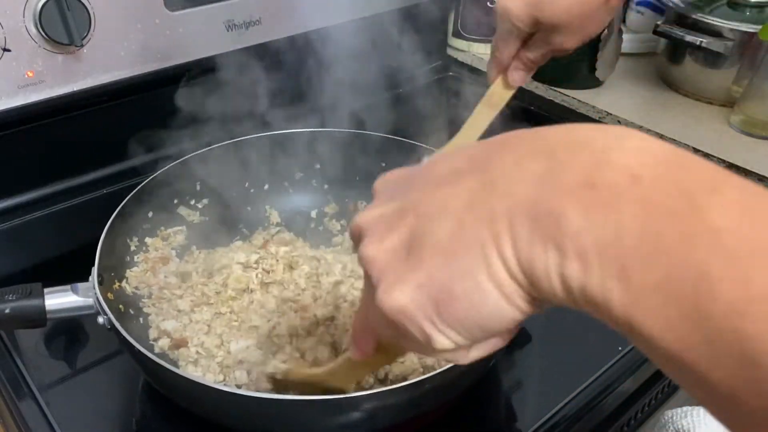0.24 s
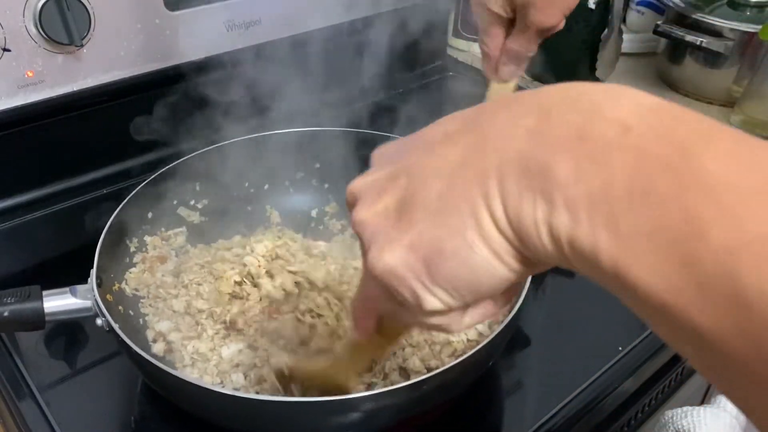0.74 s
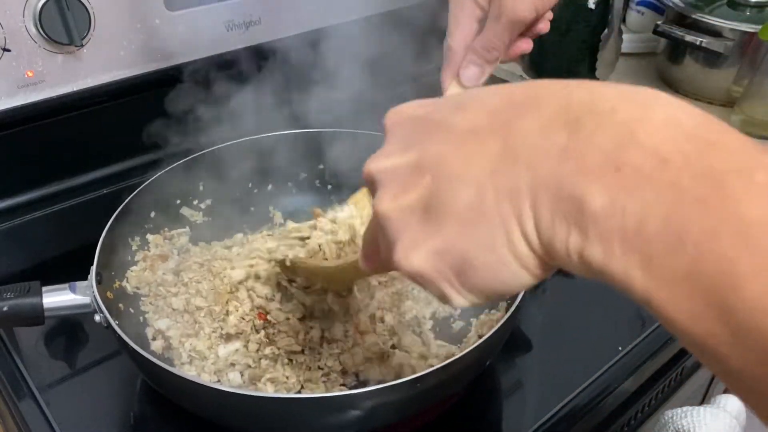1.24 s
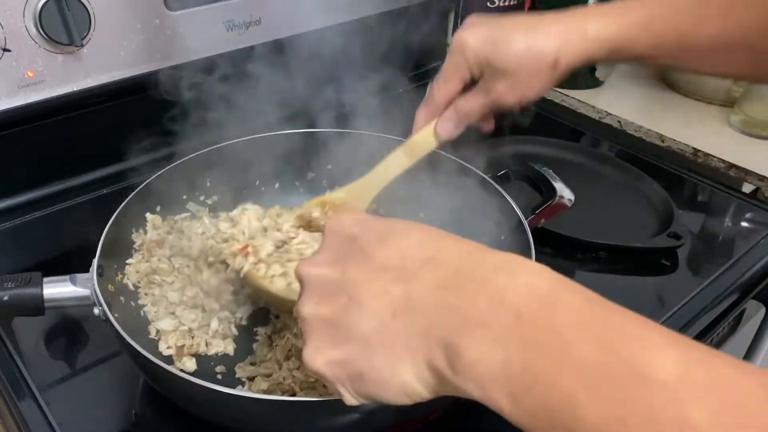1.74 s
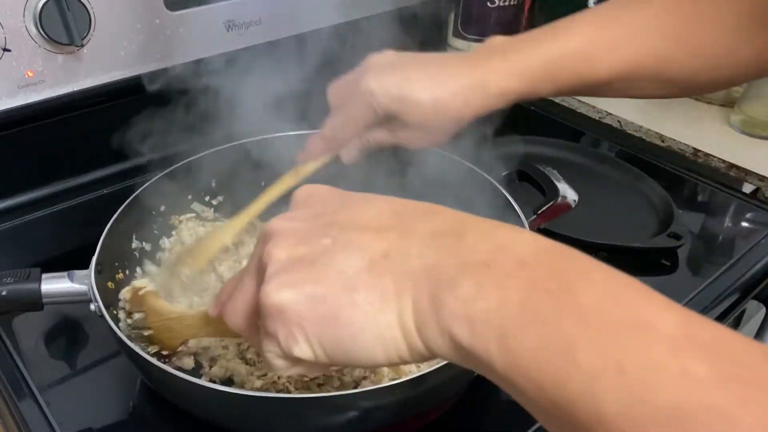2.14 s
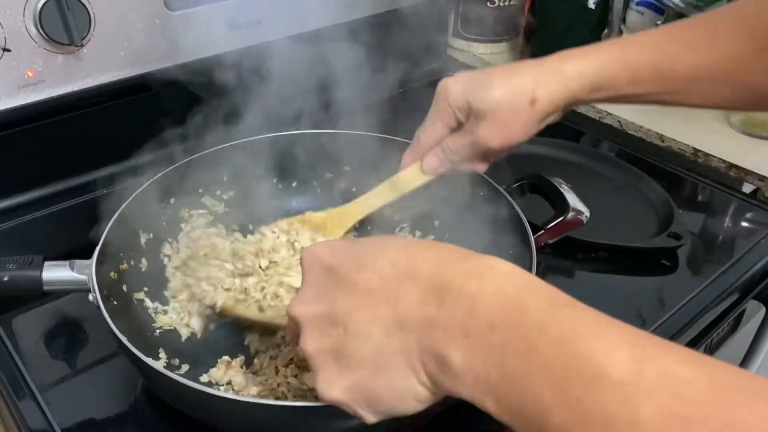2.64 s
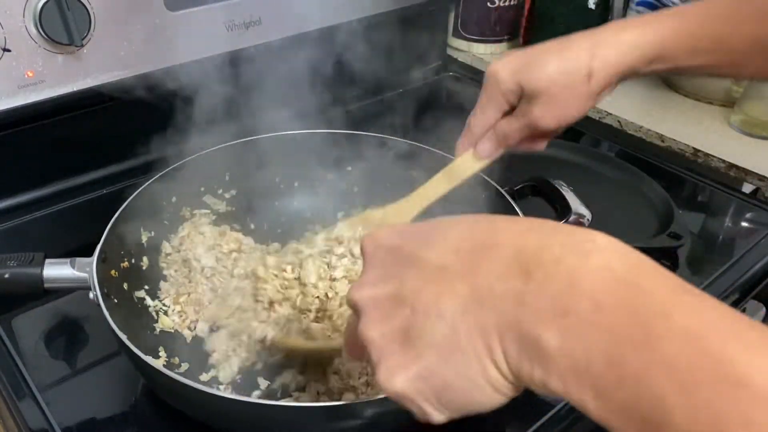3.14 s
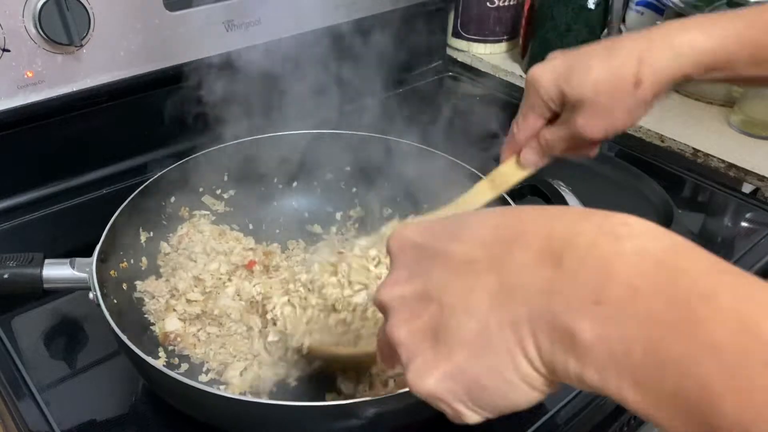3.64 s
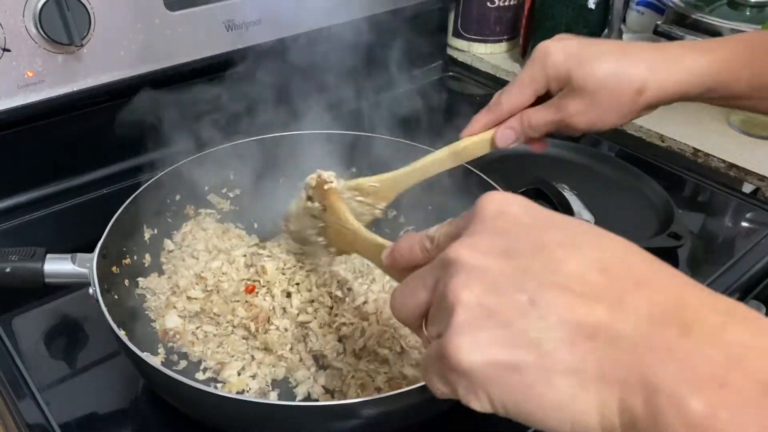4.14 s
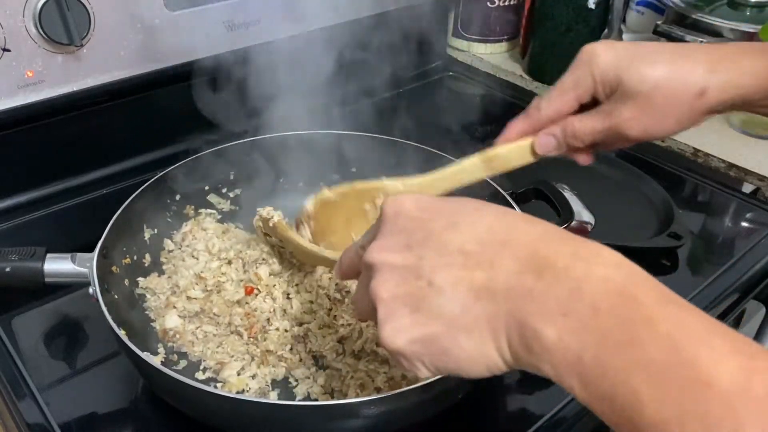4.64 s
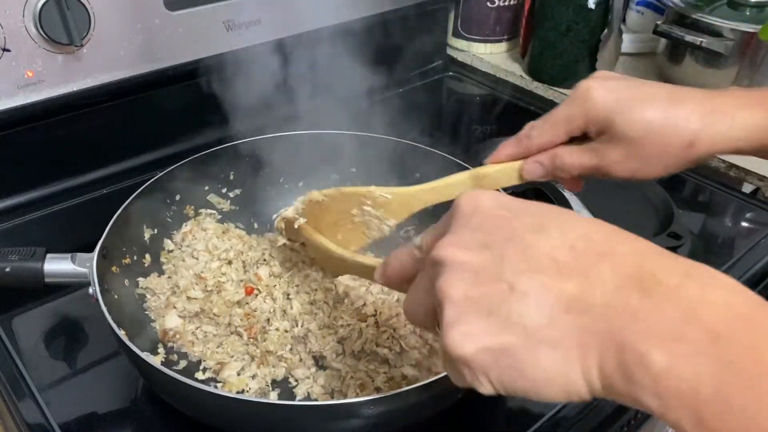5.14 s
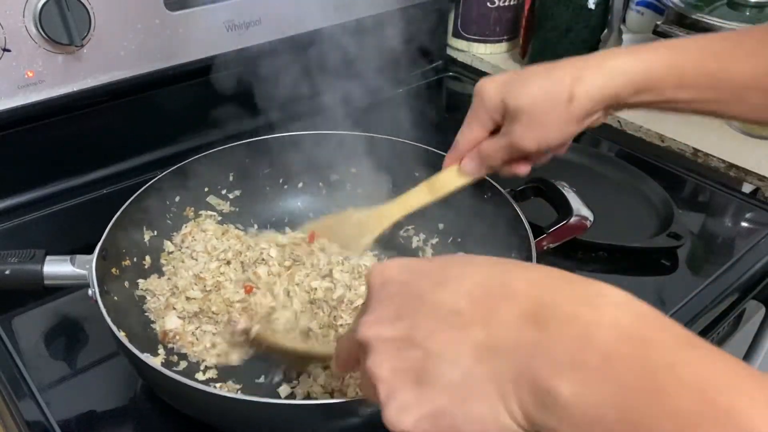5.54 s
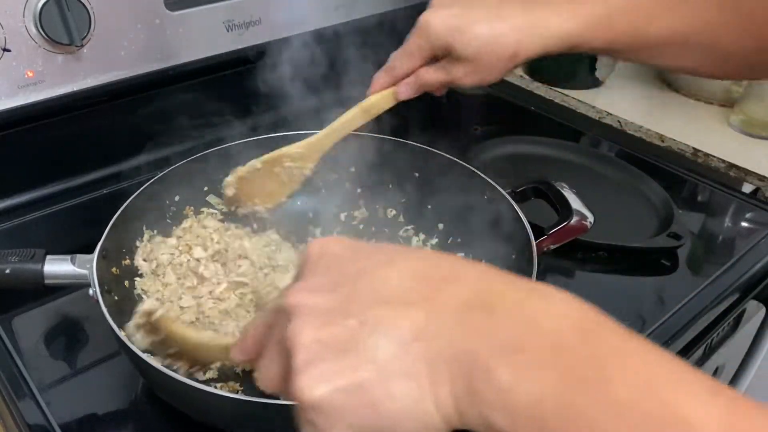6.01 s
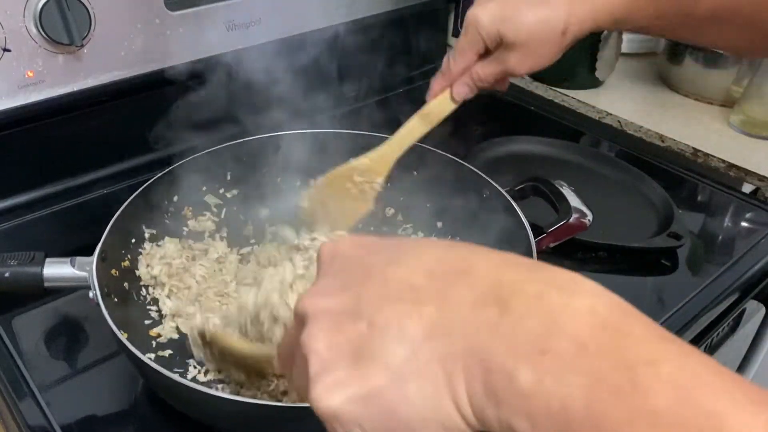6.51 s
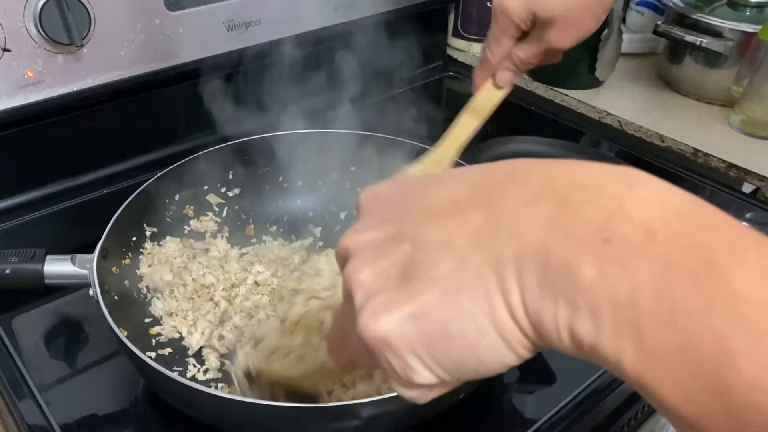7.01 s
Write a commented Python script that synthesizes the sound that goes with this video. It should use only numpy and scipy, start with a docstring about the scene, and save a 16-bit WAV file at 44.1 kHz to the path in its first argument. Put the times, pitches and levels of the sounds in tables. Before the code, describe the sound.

Moist shredded meat fries in a pan on a stove, with constant crackly sizzle and thin hiss. Two wooden spatulas stir quickly, each scraping push making the sizzle surge, with hollow knocks and clatter on the metal. The stirring eases in the middle, leaving sizzle and sharp fat spits, then resumes with the hardest knocks. Close stereo microphone, small kitchen, short echoes.

```python
"""Sizzle and thin steam hiss run throughout, from grains and noise; shredded meat fries on a glass hob.
Each stroke of the two wooden spatulas swells the sizzle, steam, boiling juice, scrape and stove rumble.
Spatula blows crack, ring the pan's modes and clatter, band by band; fat spits in short noise snaps.
A small kitchen adds brief echoes; two microphone ports hear the sum, alike at some pitches only."""
import sys
import numpy as np
from scipy import signal
from scipy.fft import rfft, irfft, next_fast_len
from scipy.io import wavfile
from scipy.ndimage import uniform_filter1d

SR = 44100
rng = np.random.default_rng(int(sys.argv[2]) if len(sys.argv) > 2 else 0)


def unload_wav(signal):
    """Save mono or channel-first audio to the path in sys.argv[1] as 16-bit WAV at rate SR, clipped to [-1, 1]."""
    wavfile.write(
        sys.argv[1],
        SR,
        np.round(np.clip(np.atleast_2d(signal).T, -1, 1) * 32767).astype(np.int16),
    )


N = 320586
SIZE = next_fast_len(N, True)
TIME_S = np.arange(N) / SR
FREQ_HZ = np.maximum(np.fft.rfftfreq(SIZE, 1 / SR), 1)

# Source spectra, relative: hz, density_db_per_hz
SIZZLE_SPECTRUM = [(300, -18), (900, -13), (1450, 1), (2100, 1), (3200, -1.5), (5200, -1), (7000, -7.5),
                   (9500, -7), (14000, -21.5)]
STEAM_SPECTRUM = [(3000, -8.5), (6500, 4.5), (9800, 5.5), (15300, 3.5)]
SCRAPE_SPECTRUM = [(130, -12), (220, -15.5), (340, 0.5), (430, -4), (650, 1), (900, 0.5), (1500, -6),
                   (2500, -31), (5000, -18.5)]
RUMBLE_SPECTRUM = [(20, -34), (42, -24), (63, -0.5), (80, -1), (105, 0.5), (130, -3.5), (165, -10.5),
                   (220, -8), (400, -31)]
# Meat lying still, levels before layer trims: time_s, sizzle_db, steam_db, juice_db
SIMMER_LEVELS = [(0, -52, -47, -63), (.4, -49, -47, -57), (.8, -49, -56, -60), (1.35, -47, -60, -48.5),
                 (1.8, -54, -51, -56), (2.352, -60, -79, -54.5), (2.801, -72, -54.5, -65.5),
                 (3.346, -56.5, -49.5, -80), (3.8, -58, -49.5, -59), (4.1, -50, -56, -54.5),
                 (4.7, -48.5, -54, -48.5), (5.3, -47, -52, -57.5), (5.7, -52.5, -49.5, -69),
                 (6.4, -48, -59, -48), (6.8, -54.5, -50, -66), (7.27, -53, -48, -71)]
# Strokes pushing meat onto hot metal; settle before linger factors, levels before layer trims:
# peak_s, push_s, settle_s, sizzle_db, steam_db, scrape_db, drag_db
STIR_STROKES = [(0.09, 0.024, 1, -46.5, -64, -58.5, -63), (0.351, 0.071, 0.079, -38, -41.5, -43.5, -51),
                (0.65, 0.017, 0.19, -43.5, -53, -53, -61), (1.0, 0.12, 0.13, -39.5, -46, -47.5, -56.5),
                (1.482, 0.071, 0.15, -38, -51, -43, -52), (1.88, 0.085, 0.22, -48, -56, -54.5, -60),
                (2.19, 0.12, 0.23, -39.5, -48.5, -48, -54.5), (2.52, 0.1, 0.93, -44, -52, -50.5, -56.5),
                (3.1, 0.14, 0.13, -42, -48, -49.5, -55), (3.47, 0.038, 0.092, -44.5, -52, -67, -57),
                (3.61, 0.085, 0.17, -38, -58, -45.5, -51.5), (3.9, 0.092, 0.79, -46, -57, -57.5, -65.5),
                (4.44, 0.031, 0.023, -46, -58, -50.5, -74), (5.501, 0.075, 0.082, -35, -45, -38, -45.5),
                (5.75, 0.039, 0.066, -72, -47, -57, -59), (5.91, 0.059, 0.13, -44, -52, -51.5, -57),
                (6.13, 0.073, 0.15, -39.5, -55, -43.5, -49), (6.575, 0.069, 0.094, -37, -47, -38, -49.5),
                (7.14, 0.19, 0.11, -40, -46.5, -47, -55)]
# Spatula blows; thud to click relative to level_db; snap lifts the crack, ring lifts the two notes:
# start_s, level_db, thud_db, boom_db, body_db, clack_db, rap_db, tick_db, click_db, snap_db, ring_db,
# length_factor, pan_note_hz, wood_note_hz
SPATULA_BLOWS = [(0.199, -42, 6, 5, 4, 6, 6, 5.5, -2, 1, 2, 1.9, 662, 980),
                 (0.263, -37.5, 3, -5, -7, -15, -9, -18, -18, -1, 12, 0.99, 277, 1640),
                 (0.336, -44, 3, -13, -9, -9, -11, -6, -12, 11, 2, 0.86, 348, 1535),
                 (0.725, -41.5, 5.5, 6, 8, 12, -12, 4.5, -1, 4, 7, 1.4, 521, 892),
                 (0.825, -36.5, 3.5, -5, -3.5, -9, -20, -24, -26, 0, 6, 0.82, 292, 894),
                 (1.031, -44, 7.5, 2.5, -10, -6, -7, -14, -16, 0, 7, 0.89, 348, 1205),
                 (1.374, -49, 11.5, 14, -2, -11, -6, -7, -10, -7, -3, 0.82, 420, 1300),
                 (1.391, -45.5, -8, -7, 5, -13, -2, -1, -7, 2, 14, 0.77, 438, 1340),
                 (2.041, -37.5, 8.5, -2.5, -3, -3, -7, -11, -17, -1.5, 6, 1.4, 350, 1375),
                 (2.106, -45.5, 12.5, 0, -9, -10, 1, -4, -11, -5, 2, 1.1, 365, 1440),
                 (2.4091, -37.5, 8.5, -9, -7, -7, -5.5, -9, -14, -2, -3, 0.81, 333, 1380),
                 (2.4301, -30.5, -4.5, -9, 4, 2, -7, 0.5, -4.5, 4, -2, 1.05, 596, 2000),
                 (2.455, -39.5, -7, -8, 3, -6, -11, -2, -9, -3, -2, 0.81, 595, 2010),
                 (2.635, -33, 2, -1, -3, -6.5, -8.5, -20, -24, 2, 8.5, 0.92, 318, 1190),
                 (3.003, -63.5, 12, 17, -3, -7, -8, -11, -13, -1, 0, 1, 337, 1345),
                 (3.317, -56.5, 6.5, 8, -6, -13.5, -18, -16, -18, 3, 8, 1.2, 326, 1140),
                 (3.454, -59.5, -18, -5, 6, 13, 0, 0, 12, -3, 19, .9, 640, 717),
                 (3.5, -44, -4, -2, 4, -5, -5, -4, -9, 4, 6, 0.98, 437, 710),
                 (3.924, -54, -6, 11.5, -6, -1, -4, -8, -10, -2, -4, 1.2, 337, 1285),
                 (4.224, -50, -16, -10, 0.5, -3, -3, -4, -8, 16, 0, 0.63, 370, 1450),
                 (4.962, -51, -4, -18, 0, -7, -4, -7, -10, 0, 8, 0.62, 600, 755),
                 (5.344, -40.5, 8.5, 10.5, 4.5, 15, 9.5, 3.5, 6, -1, 8, 1.8, 505, 1002),
                 (5.3839, -28.5, -1.5, -1.5, -0.5, 3, 2.5, -7, -12, 3.5, 13, 0.79, 324, 1200),
                 (5.4095, -37, -3, -6, 3.5, -5, -12, -16, -18, 3, 1, 0.9, 340, 820),
                 (6.007, -49.5, 5, 5.5, -4, -8, -11, -16, -18, -3, -3, 0.65, 312, 782),
                 (6.074, -29.5, 9.5, -1.5, -4, -2.5, -4.5, -8, -13, -1.5, 7.5, 1, 363, 1444),
                 (6.096, -34, 6, -5, -3.5, -3, -3, -9, -18, 1, 6.5, 0.87, 354, 1430),
                 (6.217, -37, 1.5, 1, -2.5, -25, -21, -22, -24, 3.5, 1, 1.1, 343, 1500),
                 (6.339, -31.5, 2.5, -1.5, -4.5, -9, -13, -19, -25, 2, 9, 0.9, 328.6, 712),
                 (6.36, -38.5, 1, 0, 0, -9, -21, -22, -24, 5, 3, 1.1, 377, 715),
                 (6.4983, -32.5, -10, -4, 5, -8, -5.5, -16, -15, 6, 11, 0.98, 480, 1336),
                 (7.001, -38.5, 7.5, 8.5, 6, 13, 8.5, 3, 0, 0, 9, 0.97, 495, 1016),
                 (7.028, -38, -3, -6, 3.5, -1, -2, -10, -14, 0, 6, 0.85, 495, 1005),
                 (7.09, -30.5, -0.5, 0, -3.5, -6, -11, -22, -17, -1, 2, 0.73, 282, 1189)]
# Bands of a blow: knock, boom, thud, body, clack, rap, tick, valley above tick, click; t60 at length 1:
# low_hz, high_hz, rise_s, t60_s, tail_db, gain_db, clatter_db, crack_db, side_factor
BANDS = [(242, 420, 0.0009, 0.057, -10, 1, -4.5, 13, 0.5), (58, 121, 0.011, 0.15, -13, 0, -6, -21, 0.12),
         (115, 257, 0.0085, 0.066, -10, -0.5, -9, -5, 0.2),
         (420, 690, 0.0005, 0.055, -12, 0.5, -1, 14, 1.05),
         (690, 1150, 0.00047, 0.07, -12, -0.5, 1, 13, 0.55),
         (1180, 1750, 0.0005, 0.08, -11, -0.5, 1.5, 13, 0.8),
         (1800, 2850, 0.00015, 0.085, -15, -0.5, 3, 16, 0.6),
         (2850, 4100, 0.0003, 0.08, -16, -6.5, 8, 18, 0.55),
         (4150, 5450, 0.0003, 0.09, -16, -0.5, 7, 18, 0.55)]
# Pan and stove-top resonances before scatter; t60 at length 1: hz, level_db, t60_s
MODES = [(64.05, -10, 0.64), (98.8, -2.5, 0.15), (148.6, -6, 0.21), (165.8, 2.5, 0.16), (214.4, -9, 0.19),
         (240, -17, 0.22), (278.3, -8, 0.4), (329.6, -2, 0.19), (357.3, 0.5, 0.23), (443, -4.5, 0.26),
         (488.6, 0.5, 0.24), (559, -3, 0.16), (638, -2.5, 0.15), (710, 0.5, 0.088), (773, 0, 0.16),
         (823, 1.5, 0.08), (890, 14, 0.029), (1007, -4, 0.22), (1102, 1.5, 0.06), (1245, 1, 0.19),
         (1335, -3, .08), (1440, -14, 0.08), (1517, 0, 0.11), (1615, 0.5, 0.13), (1990, 3, 0.12),
         (2110, 5, 0.091), (2370, 5, 0.062), (3360, 13, 0.082), (4640, 5, 0.059), (5100, 0, 0.069)]
# Crack returns from pan wall, hob and back panel, before delay scatter: delay_s, gain
CRACK_RETURNS = [(0.0005, 0.72), (.0019, -.7), (.0046, 0.28), (.0071, -0.33)]
# Single fat spits, before port balance: start_s, peak_db, centre_hz, reach_each_side_octaves
FAT_SPITS = [(4.138, -34, 10400, .6), (4.289, -30, 2200, 0.89), (4.385, -31, 1700, 1),
             (4.445, -29, 1600, .8), (4.652, -22.5, 2090, 1.3), (4.659, -25, 1780, 1),
             (4.719, -24.5, 2700, 1.2), (4.76, -25, 4200, 0.76), (4.8, -29, 7000, 1.1),
             (4.852, -28, 1500, 0.6), (4.858, -29, 1500, 0.98), (4.878, -32, 4970, 0.97),
             (4.889, -28, 3800, 1.2), (5.128, -28.5, 2200, 0.92), (5.283, -35, 2630, 1.2)]
# Microphone ports; likeness before its treble limit: hz, likeness_0_to_1, left_minus_right_db
PORT_RESPONSE = [(100, 0.96, 0.2), (200, 0.82, 1), (356, 0.72, -3.5), (515, 0.3, 3), (644, 0.34, 3.5),
                 (1350, 0.16, 1.5), (2350, 0, 3), (4260, 0, 4), (5800, 0.05, 7), (7760, 0.97, -0.5),
                 (14000, 1, 0)]

PORT_LAG_S, TOP_HZ = 0.0002953, 15450
STEAM_LAG_S = 0.034  # steam rises a little after the sizzle
STEAM_LINGER, JUICE_LINGER = 1.05, 0.31  # factors on settle_s
STROKE_JUICE_DB = -8.5  # relative to a stroke's sizzle_db
REST_SCRAPE_DB, REST_RUMBLE_DB = -56.5, -68  # between strokes, before layer trims
POP_CAP_DB = 14
MODE_SCATTER_DB, MODE_DETUNE = 2.5, 0.007  # standard deviations; detune is a ratio
NOTE_BUILD_UP_S, NOTE_T60_S = 0.0018, 0.07  # t60 at length 1
CONTACT_DB, CONTACT_LO_HZ, CONTACT_HI_HZ = 3, 480, 2900
BLOW_LEAN_DB = 0.8  # left minus right, before port balance
STRAY_SPIT_DB, STRAY_SPIT_HZ = -36.5, 2600  # centres of random ranges


def undb(db):
    """Decibels to amplitude."""
    return 10 ** (np.asarray(db) / 20)


def unit(x):
    """Scale to rms 1."""
    return x / np.sqrt(np.mean(x ** 2))


def on_bins(table, axis=1):
    """Interpolate a table column over the FFT bins, on log frequency."""
    table = np.array(table)
    return np.interp(np.log(FREQ_HZ), np.log(table[:, 0]), table[:, axis])


def bandpass(x, lo_hz, hi_hz, order):
    """Causal Butterworth band-pass."""
    edges_hz = [lo_hz, min(hi_hz, .45 * SR)]
    return signal.sosfilt(signal.butter(order, edges_hz, "band", fs=SR, output="sos"), x)


def walk(rate_hz):
    """Smooth random drift with a spread near 1."""
    hold = max(int(SR / rate_hz), 1)
    steps = np.repeat(rng.standard_normal(N // hold + 1), hold)
    return np.sqrt(3 / 2) * uniform_filter1d(steps, hold)[:N]


def add(out, sound, start_s):
    """Mix a stereo sound in at its start time."""
    i = max(int(start_s * SR), 0)
    out[:, i:i + sound.shape[1]] += sound[:, :max(N - i, 0)]


def grains(rate_hz, spread_db, cap_db):
    """Random clicks of random sign and exponentially spread dB size, scaled to rms 1."""
    size = undb(np.minimum(spread_db * rng.exponential(size=N), cap_db))
    fires = rng.random(N) < rate_hz / SR
    return unit(fires * size * rng.choice([-1, 1], N))


def follow_power(x, decay_per_s):
    """Power envelope with exponential decay."""
    keep = np.exp(-decay_per_s / SR)
    return signal.lfilter([1 - keep], [1, -keep], x ** 2)


def hear(x, spectrum, near_s, room_db, t60_s=0.14):
    """Colour a source and carry it to both ports; noise under its power envelope stands for echoes."""
    near = follow_power(x, 2 / near_s)
    late = follow_power(x, np.log(1e6) / t60_s)
    share = undb(2 * room_db)
    echoes = np.sqrt((near + share * late) / (1 + share)) * rng.standard_normal((2, N))
    # bass reaches both ports at once
    lag_s = np.array([[0], [PORT_LAG_S]]) * (FREQ_HZ > 1500)
    direct = np.exp(-2j * np.pi * FREQ_HZ * lag_s)
    # power share both ports hear alike; scattering keeps the treble partly unlike
    likeness = np.clip(on_bins(PORT_RESPONSE), 0, np.where(FREQ_HZ > 1500, .8, 1))
    ports = np.sqrt(likeness) * direct * rfft(x, SIZE) + np.sqrt(1 - likeness) * rfft(echoes, SIZE)
    return irfft(ports * unit(undb(on_bins(spectrum))), SIZE)[:, :N]


def swells(levels_db, linger, lag_s):
    """Summed stroke power: Gaussian rise during the push, exponential decay as the meat settles."""
    power = np.zeros(N)
    for (peak_s, push_s, settle_s, *_), db in zip(STIR_STROKES, levels_db):
        age_s = TIME_S - peak_s - lag_s
        shape = np.where(age_s < 0, (age_s / push_s) ** 2, age_s / (settle_s * linger))
        power += undb(2 * db) * np.exp(-2 * shape)
    return power


def stirred(rest_db, levels_db, linger, lag_s=0):
    """Layer level in dB: resting power plus stroke power."""
    return 10 * np.log10(undb(2 * rest_db) + swells(levels_db, linger, lag_s))


def sizzle(level_db):
    """Bursting steam bubbles: a dense fizz of grains with sparser, coarser crackle on top."""
    fizz = grains(rate_hz=16000, spread_db=-0.5, cap_db=6) * undb(level_db + 3.0 + .5 * walk(30))
    # crackle comes from the whole pan, so it swells less per stroke
    crackle = grains(rate_hz=600, spread_db=3.5, cap_db=29.5) * undb(.5 * level_db - 28.7)
    return hear(fizz + crackle, SIZZLE_SPECTRUM, near_s=0.003, room_db=0)


def steam(level_db):
    """The finest bubbles merge into thin, smooth noise."""
    hiss = rng.standard_normal(N) * undb(level_db + 1.5)
    return hear(hiss, STEAM_SPECTRUM, near_s=0.0018, room_db=-19)


def juice(level_db, centre_hz, spread, cycles, count):
    """Wet bubbles pop under the meat as damped sines, 60 dB down after the given cycles."""
    t, out = TIME_S[:400], np.zeros((2, N))
    start, place, lag = rng.random((count, 3)).T[:, :, None]
    hz = centre_hz * np.exp(spread * rng.standard_normal((count, 1)))
    size = undb(np.minimum(6.3 * rng.exponential(size=(count, 1)), POP_CAP_DB))
    pops = size * np.sin(2 * np.pi * hz * t) * np.exp(-np.log(1000) * hz * t / cycles)
    at = (start * N).astype(int) + np.arange(len(t))
    late = (lag * 2 * PORT_LAG_S * SR).astype(int)  # random lag at the right port
    out[0] = np.bincount(at.ravel(), (pops * np.sqrt(place)).ravel(), N)[:N]
    out[1] = np.bincount((at + late).ravel(), (pops * np.sqrt(1 - place)).ravel(), N)[:N]
    return unit(out) * undb(level_db)


def scrape(level_db):
    """Wood sticks and slips over the pan and tumbles moist shreds: grains with a wavering level."""
    slips = grains(rate_hz=2500, spread_db=3.5, cap_db=8.5) * undb(level_db + 2.3 * walk(40))
    return hear(slips, SCRAPE_SPECTRUM, near_s=0.016, room_db=6)


def rumble(level_db):
    """The dragged pan shakes the hollow stove top: low noise with a wavering level."""
    shaking = rng.standard_normal(N) * undb(level_db + 2.5 + 0.66 * walk(12))
    return hear(shaking, RUMBLE_SPECTRUM, near_s=.01, room_db=-6)


def contact(level_db):
    """Bare wood touches metal: one band-passed pulse with the given peak."""
    pulse = bandpass(signal.unit_impulse(SR // 100), CONTACT_LO_HZ, CONTACT_HI_HZ, order=2)
    return undb(level_db) * np.array([pulse, pulse]) / abs(pulse).max()


def crack(lo_hz, hi_hz, size):
    """A contact click's early returns in one band, peak 1."""
    clicks = np.zeros(size)
    for delay_s, gain in CRACK_RETURNS:
        clicks[int(delay_s * rng.uniform(.85, 1.15) * SR)] += gain
    sound = bandpass(clicks + 1e-18, lo_hz, hi_hz, order=2)
    return sound / abs(sound).max()


def ring_modes(t, age, notes_hz, note_db):
    """Damped sines of the pan and of two contact notes, with the frequencies and mid/side weights."""
    notes = [(f, note_db, NOTE_T60_S) for f in notes_hz]  # set by contact place and grip
    hz, db, t60_s = np.array(list(MODES) + notes).T[:, :, None]
    size = undb(db + MODE_SCATTER_DB * rng.standard_normal(hz.shape)) * rng.choice([-1, 1], hz.shape)
    detuned_hz = hz * (1 + MODE_DETUNE * rng.standard_normal(hz.shape))
    turn = np.float32(2 * np.pi * detuned_hz) * np.float32(t)
    modes = np.exp(np.float32(-np.log(1000) / t60_s) * np.float32(age)) * np.sin(turn)
    modes[-2:] *= 1 - np.exp(-t / NOTE_BUILD_UP_S)  # notes follow just after the crack
    # each mode radiates more to one side
    weights = np.array([size[:, 0], size[:, 0] * rng.uniform(-0.97, 1, len(hz))])
    return hz[:, 0], modes, weights


def knock(levels_db, notes_hz, snap_db, note_db, length):
    """One blow: crack, ringing modes and dense clatter per band; heavy low modes build up late."""
    t = TIME_S[:2 * SR // 5]
    age = t / max(length, .2)  # a spatula that stays on the pan damps it sooner
    mode_hz, modes, weights = ring_modes(t, age, notes_hz, note_db)
    noise, out = rng.standard_normal((2, len(t))), 0
    for level_db, band in zip(levels_db, BANDS):
        lo_hz, hi_hz, rise_s, t60_s, tail_db, gain_db, clatter_db, crack_db, side_factor = band
        inside = (mode_hz >= lo_hz) & (mode_hz < hi_hz)
        fade = undb(-60 * age / t60_s) + undb(tail_db - 60 * t / .35)
        clatter = unit(bandpass(noise, lo_hz, hi_hz, order=3)) * fade * undb(clatter_db)
        sound = clatter + weights[:, inside] @ modes[inside]
        sound[0] += undb(crack_db + snap_db) * crack(lo_hz, hi_hz, size=len(t))
        for f in notes_hz:
            if lo_hz <= f < hi_hz:  # stronger response near the contact note
                sound = sound + bandpass(sound, f / 1.07, f * 1.03, order=1)
        mid, side = sound * (1 - np.exp(-(t / rise_s) ** 2))
        # highest 10 ms rms sets the band level
        peak = np.sqrt(uniform_filter1d(mid ** 2, size=441, mode="constant").max())
        stereo = np.array([mid + side_factor * side, mid - side_factor * side])
        out = out + undb(level_db + gain_db) / peak * stereo
    return out


def spatulas():
    """Wood strikes the pan; place and firmness of each blow set its band levels and notes."""
    out = np.zeros((2, N))
    for blow in SPATULA_BLOWS:
        start_s, db, thud_db, boom_db, body_db, clack_db, rap_db, tick_db, click_db = blow[:9]
        snap_db, note_db, length, pan_hz, wood_hz = blow[9:]
        valley_db = (tick_db + click_db) / 2
        levels_db = db + np.array([0, boom_db, thud_db, body_db, clack_db,
                                   rap_db, tick_db, valley_db, click_db])
        add(out, knock(levels_db, (pan_hz, wood_hz), snap_db, note_db, length), start_s)
        add(out, contact(db + clack_db + snap_db + CONTACT_DB), start_s)
    return out * undb(BLOW_LEAN_DB * np.array([[.5], [-.5]]))


def spits(burst_s, echo_db, echo_s, count):
    """Water drops burst in the fat: noise snaps with a short pan echo, plus random strays."""
    t, out = TIME_S[:1200], np.zeros((2, N))
    strays = []
    for when, size, pitch in rng.random((count, 3)):
        peak_db = STRAY_SPIT_DB + 8 * (size - .5)
        centre_hz = STRAY_SPIT_HZ * 2 ** (2 * pitch - 1)
        strays.append((when * N / SR, peak_db, centre_hz, 1))
    fade = np.exp(-t / burst_s) + undb(echo_db) * np.exp(-t / echo_s)
    for start_s, db, hz, reach in list(FAT_SPITS) + strays:
        burst = rng.standard_normal((2, len(t))) * fade
        snap = bandpass(burst, hz / 2 ** reach, hz * 2 ** reach, order=2)
        add(out, undb(db) * snap / abs(snap).max(), start_s)
    return out


def scene():
    """The stirred pan: a varying simmer, stroke swells, blows and spits."""
    sizzle_db, steam_db, scrape_db, drag_db = np.transpose(STIR_STROKES)[3:]
    time_s, *columns = np.transpose(SIMMER_LEVELS)
    simmer_db, hiss_db, boil_db = (np.interp(TIME_S, time_s, c) for c in columns)
    fat = sizzle(stirred(simmer_db, sizzle_db, linger=0.81))
    vapour = steam(stirred(hiss_db, steam_db, STEAM_LINGER, STEAM_LAG_S) + 2.7 * walk(16))
    juice_db = stirred(boil_db, sizzle_db + STROKE_JUICE_DB, JUICE_LINGER)
    bubbles = juice(juice_db, centre_hz=1830, spread=0.2, cycles=12.0, count=3200)
    rubbing = scrape(stirred(REST_SCRAPE_DB, scrape_db, linger=0.63))
    stove = rumble(stirred(REST_RUMBLE_DB, drag_db, linger=1.66))
    blows = spatulas()
    snaps = spits(burst_s=0.00038, echo_db=-9.5, echo_s=0.0073, count=150)
    return fat + vapour + bubbles + rubbing + stove + blows + snaps


def record(dry):
    """The two ports colour the sound differently; a steep low-pass cuts the top."""
    balance = undb(on_bins(PORT_RESPONSE, axis=2) * np.array([[.5], [-.5]]))
    ports = irfft(rfft(dry, SIZE) * balance, SIZE)[:, :N]
    return signal.sosfilt(signal.ellip(10, .2, 80, TOP_HZ, fs=SR, output="sos"), ports)


dry = scene()
out = record(dry)
unload_wav(out)
```